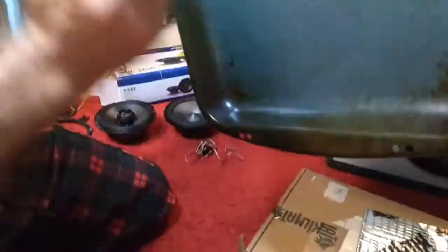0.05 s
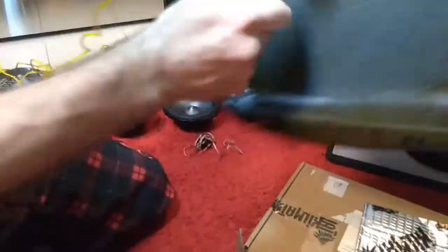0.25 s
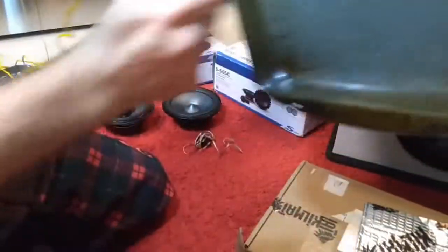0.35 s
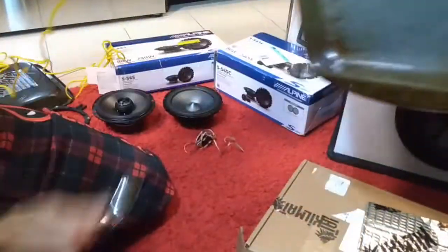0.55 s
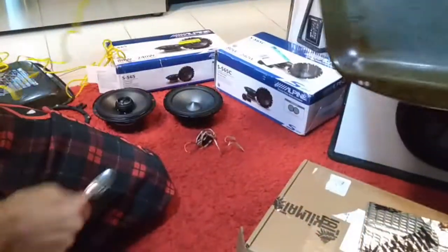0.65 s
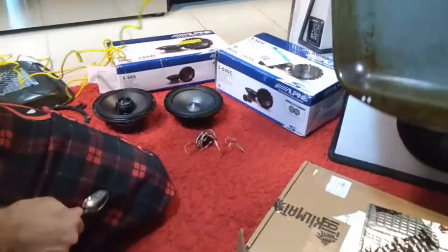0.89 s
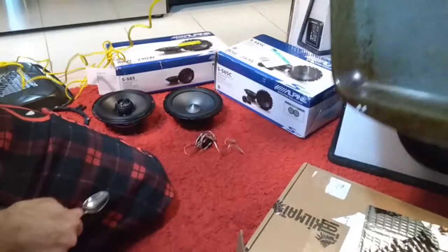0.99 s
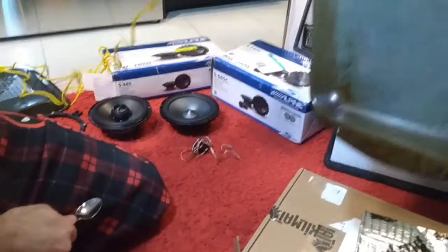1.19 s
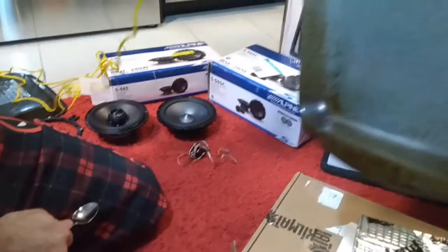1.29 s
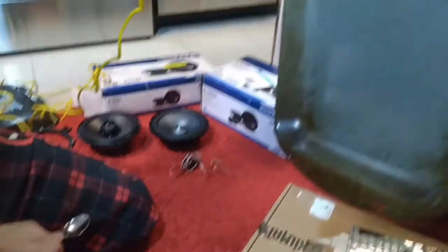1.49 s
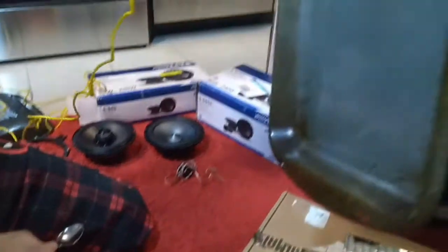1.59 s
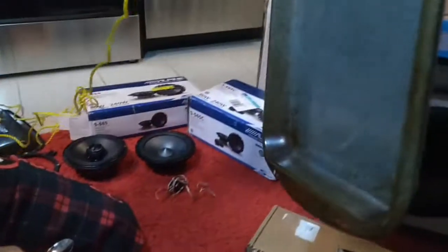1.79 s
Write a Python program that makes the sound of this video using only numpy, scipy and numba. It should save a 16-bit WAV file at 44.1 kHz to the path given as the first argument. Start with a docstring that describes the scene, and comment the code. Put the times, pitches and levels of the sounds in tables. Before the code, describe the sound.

One sharp clang comes from a spoon hitting a hanging metal panel in a quiet room. The close hit distorts slightly, then its high shimmer dies away, leaving lower bell-like tones ringing and slowly fading.

```python
"""A hanging sheet-metal panel, struck once with a steel spoon in a quiet workshop.
It hums faintly before the blow, then crashes with hundreds of modes; the high ones die first,
leaving a bell-like chord that wavers as the panel swings and turns. The blow overloads
the close microphone; a limiter ducks and recovers, so the low tones seem to swell."""
import sys
import numpy as np
from scipy import signal
from scipy.fft import rfft, irfft
from scipy.io import wavfile
from scipy.ndimage import uniform_filter1d, minimum_filter1d
from numba import njit

SR = 44100
rng = np.random.default_rng(int(sys.argv[2]) if len(sys.argv) > 2 else 0)


def store_pcm(level_fs):
    """Save levels as 16-bit WAV."""
    pcm = np.round(np.clip(level_fs, -1, 1) * 32767).astype(np.int16)
    wavfile.write(sys.argv[1], SR, np.atleast_2d(pcm).T)


N = 81585
STRIKE_S, TOP_HZ = .1643, 16100

# room noise spectrum: f/Hz, relative level/dB
ROOM_SPECTRUM = [(25, -9), (90, -4), (300, -9), (700, -5.5), (1400, -14), (3000, -32.5), (8000, -33),
                 (16000, -44.5)]
# panel tones sounding before the blow: f/Hz, relative level/dB
HUM_TONES = [(231.5, -61.5), (484.5, -72), (629.8, -67.5), (667.5, -87.5), (845.2, -56.5), (877.5, -77),
             (1163, -78), (1211, -66), (1776, -74), (2083, -70.5)]
# trend of the panel's crowded weak modes: f/Hz, median level per mode/dB, median t60/s
WEAK_MODE_TREND = [(50, -49.5, 2.2), (250, -41.5, 4), (600, -32, 1.7), (1100, -27.5, 1.5),
                   (1800, -8.5, 0.82), (2800, -9.5, 0.74), (4500, -9, 0.45), (7200, -8.5, 0.42),
                   (9610, -7, 0.29), (16000, -6, 0.16)]
# prominent panel modes, bell note near 493 Hz: f/Hz, relative level/dB, unscaled t60/s
MAIN_MODES = [(56.2, -35, 3.4), (87.5, -22, 2.7), (131.6, -33, 4.0), (178.0, -26, 3.6), (230.8, -11, 2.48),
              (248.0, -28, 4.44), (289.7, -30, 3.73), (346.2, -15, 2.51), (362.7, -10, 1.62),
              (426.0, -31, 3.25), (436.0, -31, 3.84), (477.4, -25, 3.56), (493.2, -4, 3.6),
              (604.3, -34, 5.45), (630.9, -5, 1.88), (652.4, -21, 3.38), (704.5, -30, 2.87),
              (749.3, -19, 2.57), (811.9, -10, 1.33), (828.4, -8, 1.56), (843.5, -10, 2.39),
              (880.8, -20, 2.19), (985.0, -6, 1.69), (1034.9, -4, 1.08), (1045.4, 1, 1.25),
              (1208.2, -14, 2.14), (1264.7, -11, 1.38), (1279.2, -10, 2.07), (1297.0, -5, 1.51),
              (1358.6, -13, 1.21), (1386.5, -4, 1.28), (1501.3, 2, 1.01), (1534.6, -5, 1.17),
              (1545.3, 4, 1.3), (1587.1, 1, 1.3), (1596.8, -13, 1.5), (1619.4, -4, 1.0),
              (1700.5, -14, 2.03), (1718.3, -3, 1.25), (1774.5, -9, 3.1), (1824.6, 1, 1.09),
              (1873.7, 0, 1.37), (1901.7, 0, 1.09), (1921.8, -3, 1.12), (1935.3, -4, 1.69),
              (1989.1, -11, 1.37), (2049.0, -13, 1.44), (2079.6, -12, 1.58), (2089.4, -2, 2.05),
              (2195.4, -14, 1.47), (2220.3, -12, 1.51), (2231.0, -3, 1.01), (2267.0, -5, 1.21),
              (2277.5, -2, 1.32), (2318.5, 2, 0.93), (2408.7, -5, 1.43), (2509.3, -10, 1.38),
              (2657.7, -20, 1.46), (2719.9, -10, 0.96), (2729.3, 10, 0.9), (2739.8, -7, 1.19),
              (2748.5, -1, 1.05), (2766.3, -17, 1.15), (2823.9, 0, 0.99), (2850.1, 5, 0.9),
              (2869.0, 2, 0.87), (3095.7, 7, 0.65), (3118.3, 0, 0.96), (3130.7, 3, 1.25), (3197.0, 8, 0.72),
              (3505.5, 6, 0.95), (3617.6, -3, 1.0), (3911.3, -14, 0.87), (4348.7, 0, 0.73),
              (4416.3, -6, 1.1), (4470.5, -6, 1.0), (4558.3, -11, 0.89), (5031.7, -8, 0.88),
              (5397.4, 1, 0.65), (5766.9, -4, 0.9), (6298.1, 1, 0.8), (6346.2, -3, 0.86), (6816.9, 1, 0.54),
              (7078.0, 10, 0.34), (7481.1, 10, 0.42), (8086.4, 8, 0.42), (9208.8, 4, 0.4)]
# gain as the panel swings nearer and farther on its hanger: t/s, level/dB
SWING_GAIN = [(.16, 6.5), (.35, -6), (.58, -3), (.75, -1.1), (.92, -1.5), (1.1, -1.2), (1.25, -1.5),
              (1.4, 0.5), (1.55, -0.2), (1.72, 0.5), (1.85, -0.2)]


def undb(db):
    """Decibels to gain."""
    return 10 ** (np.asarray(db) / 20)


def along(hz, table, column=1):
    """Table column interpolated over log frequency."""
    table = np.array(table)
    return np.interp(np.log(hz + 1), np.log(table[:, 0]), table[:, column])


@njit
def ring(hz, amplitude, t60_s, phase_rad):
    """Sum of damped sines, each cut off 120 dB down."""
    out = np.zeros(N)
    for k in range(len(hz)):
        phasor = amplitude[k] * np.exp(1j * phase_rad[k])
        pole = np.exp((2j * np.pi * hz[k] - np.log(1000) / t60_s[k]) / SR)
        for i in range(min(N, int(2 * t60_s[k] * SR))):
            out[i] += phasor.imag
            phasor *= pole
    return out


@njit
def follow_peak(x, attack_s, release_s):
    """Peak envelope with exponential attack and release."""
    attack, release = 1 - np.exp(-1 / (attack_s * SR)), 1 / (release_s * SR)
    out, peak = np.empty(len(x)), 0.
    for i in range(len(x)):
        peak += (abs(x[i]) - peak) * attack if abs(x[i]) > peak else -peak * release
        out[i] = peak
    return out


def room_air(rms_db=-60):
    """Dull, steady workshop noise."""
    hz = np.arange(N // 2 + 1) * SR / N
    air = irfft(rfft(rng.standard_normal(N)) * undb(along(hz, ROOM_SPECTRUM)), N)
    return air / air.std() * undb(rms_db)


def panel_hum(gain_db=7, t60_s=.99):
    """Faint vibration already in the panel, dying away."""
    hz, level_db = np.array(HUM_TONES, float).T.copy()
    phase_rad = 2 * np.pi * rng.random(len(hz))
    return ring(hz, undb(level_db + gain_db), np.full(len(hz), t60_s), phase_rad)


def spoon_contact(t, crack_db=18, crack_t60_s=.02, thump_hz=101, thump_db=-3.5, thump_s=.045):
    """A bright steel-on-steel crack; a short, low thump near 100 Hz sounds at the blow."""
    highpass = signal.butter(2, 1800, "high", fs=SR, output="sos")
    bright = signal.sosfilt(highpass, rng.standard_normal(N))
    crack = bright * undb(crack_db) * np.exp(-np.log(1000) * t / crack_t60_s)
    thump = np.sin(2 * np.pi * thump_hz * t) * undb(thump_db) * np.maximum(0, 1 - t / thump_s)
    return crack + thump


def panel_shimmer(spacing_hz=11, scatter_db=6, log_t60_scatter=.19):
    """A thin sheet has evenly crowded modes; the high ones die first."""
    slots_hz = np.arange(50, TOP_HZ, spacing_hz)
    offset, phase_cycles = rng.random((len(slots_hz), 2)).T
    strength, sustain = np.clip(rng.standard_normal((len(slots_hz), 2)).T, -2, 2)
    hz = slots_hz + spacing_hz * offset
    amplitude = undb(along(hz, WEAK_MODE_TREND) + scatter_db * strength)
    t60_s = along(hz, WEAK_MODE_TREND, column=2) * np.exp(log_t60_scatter * sustain)
    return ring(hz, amplitude, t60_s, 2 * np.pi * phase_cycles)


def panel_chord(t, gain_db=.5, t60_scale=.99, mean_waver_hz=1.6, waver_db=1.5):
    """Prominent modes start together and decay; their lobes sweep past as the panel turns."""
    out = np.zeros(N)
    for hz, level_db, t60_s in MAIN_MODES:
        waver_hz = mean_waver_hz * (.5 + rng.random())
        lobe_db = waver_db * np.sin(2 * np.pi * (waver_hz * t + rng.random()))
        decay = np.exp(-np.log(1000) * t / (t60_s * t60_scale))
        out += undb(level_db + gain_db + lobe_db) * decay * np.sin(2 * np.pi * hz * t)
    return out


def scene():
    """One blow on the humming, swinging panel, over room noise."""
    t = np.arange(N) / SR
    blow = panel_chord(t) + panel_shimmer() + spoon_contact(t)
    blow = np.pad(blow, (int(STRIKE_S * SR), 0))[:N]
    swing = undb(np.interp(t, *np.array(SWING_GAIN).T))
    return (blow * swing + panel_hum() + room_air())[None]


def microphone(x, overload_db=18.5, bias=.04, band_hz=(38, 12800)):
    """Asymmetric saturation, then band-pass."""
    ceiling = undb(overload_db)
    saturated = ceiling * (np.tanh(x / ceiling + bias) - np.tanh(bias))
    return signal.sosfilt(signal.butter(2, band_hz, "band", fs=SR, output="sos"), saturated)


def limiter(x, threshold_db=-2, treble_weight=.34, lookahead_s=.024):
    """Gain ducks ahead of peaks and recovers; the detector favours treble."""
    sensed = x + treble_weight * np.diff(x, prepend=0)
    peak = follow_peak(sensed, attack_s=.0001, release_s=.069)
    gain = 1 / np.maximum(1, peak / undb(threshold_db))
    span = int(lookahead_s * SR)
    held_gain = minimum_filter1d(gain, size=span)
    return x * uniform_filter1d(held_gain, size=span)


def record(dry):
    """Overloaded microphone, limiter, steep low-pass."""
    lowpass = signal.ellip(10, .2, 90, TOP_HZ, fs=SR, output="sos")
    return signal.sosfilt(lowpass, limiter(microphone(dry[0])))[None]


dry = scene()
out = record(dry)
store_pcm(out)
```